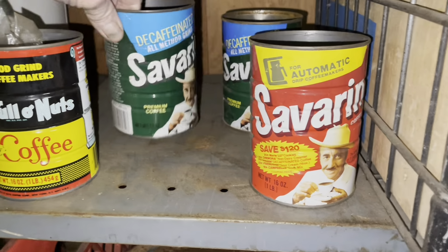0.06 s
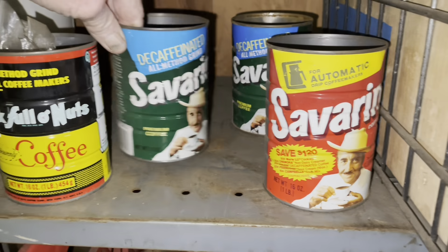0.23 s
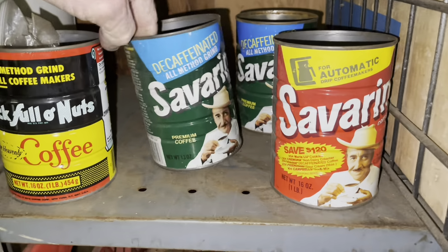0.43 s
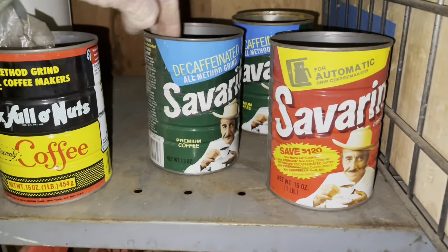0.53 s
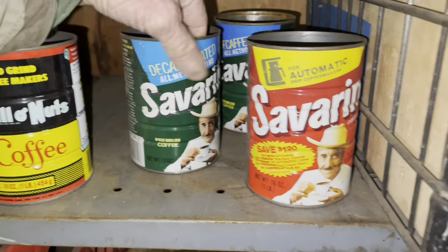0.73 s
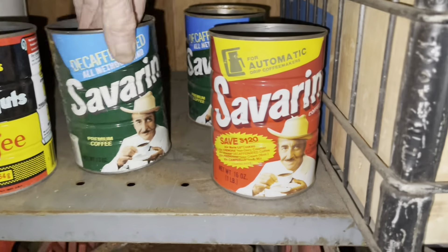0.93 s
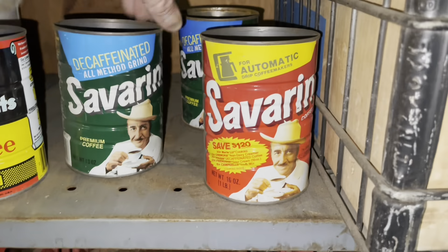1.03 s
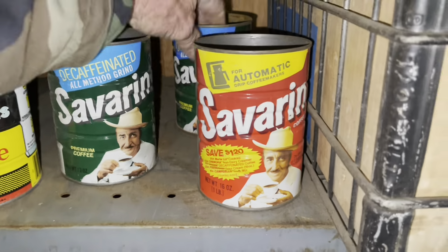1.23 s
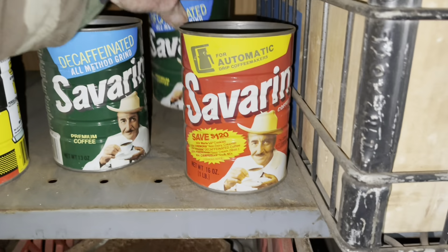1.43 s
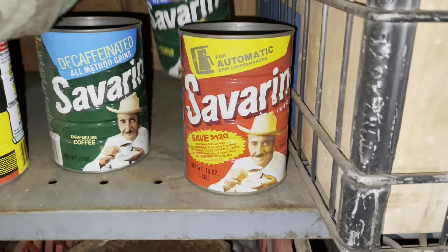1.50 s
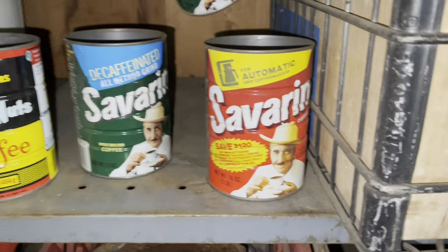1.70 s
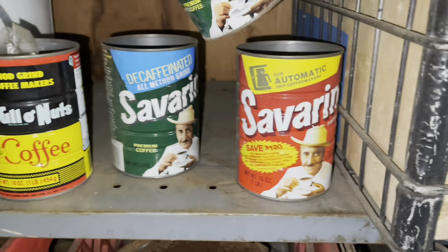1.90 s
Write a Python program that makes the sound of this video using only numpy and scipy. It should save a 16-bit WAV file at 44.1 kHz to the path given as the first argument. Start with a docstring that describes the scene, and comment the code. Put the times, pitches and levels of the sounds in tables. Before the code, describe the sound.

Hollow tin cans clunk and scrape as they are shifted around a metal shelf.

```python
"""Coffee tins on a steel shelf

Empty tins are shifted by hand on a sheet-steel shelf in a garage. One is set down, rocks, scrapes
along and clinks against its neighbour; a last one is knocked. Impacts and stick-slip friction excite
the normal modes of three resonators: the hollow tin, the booming shelf and the thin, bright tin wall."""
import sys
import numpy as np
from scipy import signal
from scipy.fft import rfft, irfft, next_fast_len
from scipy.io import wavfile
from scipy.ndimage import uniform_filter1d

SR = 44100
rng = np.random.default_rng(int(sys.argv[2]) if len(sys.argv) > 2 else 0)


def inscribe(sig):
    """Save sig as 16-bit PCM at rate SR to the path in sys.argv[1].

    A 1-D sig is mono; a 2-D sig holds one channel per row.
    Samples are clipped to [-1, 1] before scaling.
    """
    pcm = np.round(np.clip(np.atleast_2d(sig).T, -1, 1) * 32767)
    wavfile.write(sys.argv[1], SR, pcm.astype(np.int16))


N = 85995
T = np.arange(SR) / SR  # time axis of one free decay [s]

# Modes of the tin's hollow and of the shelf (frequency [Hz], level [dB], T60 [s])
HOLLOW_MODES = [(462, -3, 0.13), (544.6, -10.5, 0.067), (615.4, -11.5, 0.1)]
SHELF_MODES = [(62.2, -15, 0.77), (112.4, -16.5, 0.62), (151.5, -16, 0.35), (190.4, -8.5, 0.39),
               (242.1, -3, 0.27), (271.5, -4.5, 0.15), (444.6, 3, 0.14), (489.5, 3.5, 0.097),
               (537, -3.5, 0.33), (582.2, -2, 0.14)]
# Spectra of the dense modes: shelf clang, tin-wall clash (frequency [Hz], level [dB])
CLANG_SPECTRUM = [(40, -26.5), (110, 4), (420, 1), (600, 5.5), (720, -2.5), (1000, 0), (2100, -7),
                  (2800, -20.5), (14000, -75)]
CLASH_SPECTRUM = [(300, -11), (2100, -3.5), (2700, -1.5), (4000, 5.5), (5400, 1), (7500, 1), (8900, 1.5),
                  (10100, -10.5), (11500, 2), (13500, -34)]
# Their decay times (frequency [Hz], T60 [s])
CLANG_DECAY = [(100, 0.81), (1500, 0.25), (5000, 0.52)]
CLASH_DECAY = [(1000, 0.29), (10000, 0.15)]
# Tin on shelf (time [s], hollow pitch [Hz], hollow [dB], boom [dB], clang [dB], clash [dB]);
# each level column is relative to its own resonator
IMPACTS = [(0.17, 468.3, -13.5, -34.5, -42, -30.5), (0.368, 455.2, -5.5, -24, -31.5, -38),
           (0.378, 465, -8.5, -47, -28.5, -31.5), (0.519, 494, -15, -25, -34.5, -38.5),
           (0.758, 460, -32, -30, -40.5, -33), (0.927, 450.4, -9, -27.5, -29.5, -29),
           (1.037, 477, -18.5, -28, -27.5, -26), (1.131, 469, -16, -28.5, -38, -34),
           (1.14, 473, -37, -25.5, -31, -30), (1.356, 469, -13, -26.5, -24.5, -31),
           (1.37, 445, -16.5, -23, -33.5, -33.5)]
CONTACT_S, SWELL_S, CRACK_S, CRACK_DB = .001, .003, .006, 4
OVERTONE_BAND_HZ, OVERTONE_T60_S, OVERTONE_DB = (680, 2100), 0.47, -13  # inharmonic shelf partials
def knocks():
    """Impact excitation: hollow, shelf and wall decay freely; the hollow's pitch shifts with the grip."""
    out = np.zeros((2, N))
    rise, swell = 1 - np.exp(-T / CONTACT_S), 1 - np.exp(-T / SWELL_S)
    crack = rise * (1 + amp(CRACK_DB) * np.exp(-T / CRACK_S))
    overtone_hz = np.exp(rng.uniform(*np.log(OVERTONE_BAND_HZ), size=24))
    poles = 2j * np.pi * overtone_hz - np.log(1000) / OVERTONE_T60_S
    overtones = np.exp(np.outer(poles, T)) * (OVERTONE_BAND_HZ[0] / overtone_hz)[:, None]
    for s, pitch_hz, hollow_db, boom_db, clang_db, clash_db in IMPACTS:
        hollow = ring([(hz * pitch_hz / HOLLOW_MODES[0][0], db, t60) for hz, db, t60 in HOLLOW_MODES])
        phases = np.exp(2j * np.pi * rng.random((2, len(overtone_hz))))
        boom = ring(SHELF_MODES, spread_db=2.0)
        add(out, s, swell * (amp(hollow_db) * hollow + amp(boom_db) * boom))
        add(out, s, amp(clang_db + OVERTONE_DB) * rise * (phases @ overtones).real)
        add(out, s, amp(clang_db) * colour(crack * dense_modes(CLANG_DECAY), CLANG_SPECTRUM))
        add(out, s, amp(clash_db) * colour(crack * dense_modes(CLASH_DECAY), CLASH_SPECTRUM) / 2)
    return out


# Modes of the thin tin wall (frequency [Hz], level [dB], T60 [s])
WALL_MODES = [(3169, 3, 0.062), (3880, 7, 0.028), (4584, 0.5, 0.052), (8680, 3.5, 0.066), (9280, 3, 0.074)]
# Friction forces on the sliding tin (time [s], drag level [dB], grit level [dB])
FRICTION = [(0, -52, -57), (.31, -53, -61.5), (.5, -39, -51), (.55, -23.5, -56), (0.587, -25, -43),
            (0.638, -39.5, -68), (0.749, -43, -47), (0.76, -22, -42.5), (.855, -25.5, -35),
            (.895, -23, -40.5), (.94, -24.5, -41.5), (1.001, -24.5, -46), (1.11, -35.5, -56),
            (1.15, -25.5, -45), (1.274, -29, -47.5), (1.34, -42, -51.5), (1.399, -31.5, -62),
            (1.458, -57.5, -75.5), (1.95, -60.5, -66)]
HAND_DAMPING_S = 0.052  # time constant with which the hand stills the wall's clash
def scrape():
    """Stick-slip friction: drag drives the hollow and the shelf; grit under the rim drives the wall."""
    s, drag_db, grit_db = np.transpose(FRICTION)
    t, force = np.arange(N) / SR, slips()
    drag = force * amp(np.interp(t, s, drag_db))
    grit = force * amp(np.interp(t, s, grit_db))
    hollow = amp(-6.5) * excite(drag, ring(HOLLOW_MODES))
    boom = amp(-4) * excite(drag, ring(SHELF_MODES))
    clang = amp(-11) * excite(drag, colour(dense_modes(CLANG_DECAY), CLANG_SPECTRUM))
    clash = excite(grit, colour(dense_modes(CLASH_DECAY) * np.exp(-T / HAND_DAMPING_S), CLASH_SPECTRUM))
    wall = amp(-4) * excite(grit, ring(WALL_MODES))
    return hollow + boom + clang + clash + wall


def slips(per_second=1000, spread_db=4.2, judder_s=.014, judder_db=3):
    """Friction as a Poisson process: uneven force pulses that swell and fade as the tin judders."""
    sizes = amp(spread_db * np.minimum(rng.exponential(1, N), 4)) * rng.choice([-1, 1], N)
    judder = unit_rms(uniform_filter1d(rng.standard_normal(N), round(judder_s * SR)))
    return unit_rms(sizes * amp(judder_db * judder) * (rng.random(N) < per_second / SR))


# Modes of the rim and of a tin damped by the hand (frequency [Hz], level [dB], T60 [s])
RIM_MODES = [(3015, -14, .45), (3752, -3, 0.3), (4030, -7, .25), (4560, -4, 0.44), (5206, -7, 0.22),
             (5561, -12, .35), (6132, 1, 0.25), (6315, -10, 0.22), (7074, -4, 0.15), (7607, -1, 0.16),
             (8285, -9, 0.15), (8737, -2, 0.19), (9130, -3, 0.13)]
HELD_MODES = [(529, 7.5, 0.035), (601, 9, 0.019), (852, -1.5, 0.018), (1070, -1.5, 0.0045)]
# The tin rocks on its base; the held tin bumps (time [s], level [dB])
ROCKINGS = [(0.227, -31.5), (0.813, -17.5), (0.951, -11.5), (0.996, -19.5), (1.076, -27.5), (1.235, -18.5),
            (1.246, -20), (1.277, -25.5), (1.412, -15)]
HELD_BUMPS = [(0.37, -23), (0.524, -21), (0.993, -21), (1.356, -15.5), (1.517, -27.5)]
def light_contacts(clink_s=1.038, clink_db=-33.5):
    """Selective excitation: clinking rims ring high modes, rocking the hollow, bumps a few damped modes."""
    out = np.zeros((2, N))
    add(out, clink_s, amp(clink_db) * (ring(RIM_MODES) + ring(WALL_MODES)))
    for s, db in ROCKINGS:
        add(out, s, amp(db) * (1 - np.exp(-T / SWELL_S)) * ring(HOLLOW_MODES))
    for s, db in HELD_BUMPS:
        add(out, s, amp(db) * ring(HELD_MODES))
    return out


# Modes of the snagging rim (frequency [Hz], level [dB], T60 [s])
SQUEAK_MODES = [(3850, -8.5, .06), (4280, 0.5, 0.0092), (4460, 1.5, 0.019)]
def snag(start_s=.8545, fade_s=0.014, level_db=-35):
    """Transient stick-slip: the rim catches, then lets go in a fading burst heard as a squeak."""
    out = np.zeros((2, N))
    burst = slips()[:SR] * np.exp(-T / fade_s)
    add(out, start_s, amp(level_db) * excite(burst, ring(SQUEAK_MODES)))
    return out


# Modes of the carried tin (frequency [Hz], level [dB])
RUBBED_MODES = [(457.6, -55), (1303, -63), (3165, -66), (3801, -67), (4590, -70), (6885, -73)]
def finger_rub(bandwidth_hz=9.3, end_s=0.37):
    """Random forcing: rubbing fingers sustain narrow resonances that fade as the tin is set down."""
    t, shape = np.arange(N) / SR, (len(RUBBED_MODES), N)
    pole = np.exp(-np.pi * bandwidth_hz / SR)
    force = rng.standard_normal(shape) + 1j * rng.standard_normal(shape)
    wavers = signal.lfilter([1 - pole], [1, -pole], force)
    tones = sum(amp(db) * unit_rms((waver * np.exp(2j * np.pi * hz * t)).real)
                for (hz, db), waver in zip(RUBBED_MODES, wavers))
    return tones * np.sqrt(np.clip(1 - t / end_s, 0, 1))


# Reverberation time (frequency [Hz], T60 [s])
GARAGE_DECAY = [(220, 0.82), (450, 0.11)]
def garage_reverb(sound, level_db=-11):
    """Reverberation: the garage's dense modes prolong the sound, the bass longest."""
    return amp(level_db) * excite(sound, dense_modes(GARAGE_DECAY))


# Background spectrum (frequency [Hz], level [dB])
ROOM_SPECTRUM = [(20, -29), (62, 5.5), (250, -2), (350, -17.5), (450, -13.5), (720, -24.5), (9000, -34.5),
                 (14000, -67)]
def room_tone(level_db=-50.5):
    """Stationary noise: a faint, low rumble fills the garage."""
    return amp(level_db) * unit_rms(colour(noise_pair(N), ROOM_SPECTRUM))


# Likeness of left and right (frequency [Hz], coherence [0-1])
COHERENCE = [(500, 0.97), (1000, 0.62), (2000, 0.16)]
def noise_pair(count):
    """Spatial coherence: white noise at two nearby points is most alike at long wavelengths."""
    shared, separate = rfft(rng.standard_normal((2, count)))
    same = np.clip(read(COHERENCE, np.fft.rfftfreq(count, 1 / SR)), -1, 1)
    return irfft(np.array([shared, same * shared + np.sqrt(1 - same ** 2) * separate]), count)


def dense_modes(t60s, size=256):
    """Modal overlap: countless modes merge into noise, each band decaying at its own rate."""
    hz, t, bands = signal.stft(noise_pair(SR), SR, nperseg=size)
    decay = np.exp(-np.log(1000) * t / read(t60s, hz)[:, None])
    return signal.istft(bands * decay, SR, nperseg=size)[1][:, :SR]


def ring(modes, spread_db=0):
    """Modal superposition: damped sines of alternating sign; the strike point varies their levels."""
    offsets_db = spread_db * rng.standard_normal(len(modes))
    return sum((-1) ** k * amp(db + offsets_db[k]) * np.exp(-np.log(1000) * T / t60)
               * np.sin(2 * np.pi * hz * T) for k, (hz, db, t60) in enumerate(modes))


def excite(force, body):
    """Linear response: a force convolved with a body's impulse response, scaled to unit energy."""
    body = np.atleast_2d(body)
    return signal.fftconvolve(np.atleast_2d(force), body / np.linalg.norm(body[0]), axes=1)[:, :N]


def colour(x, spectrum, size=4096):
    """Minimum-phase filtering: a causal, unit-energy response imposes the spectrum."""
    log_gain = np.log(amp(read(spectrum, abs(np.fft.fftfreq(size, 1 / SR)))))
    taps = np.fft.ifft(np.exp(np.conj(signal.hilbert(log_gain)))).real[:size // 2]
    return signal.oaconvolve(x, taps[None] / np.linalg.norm(taps), axes=1)[:, :x.shape[1]]


def amp(db):
    """Decibels to amplitude ratio."""
    return 10 ** (np.asarray(db) / 20)


def unit_rms(x):
    """Normalisation to unit mean power."""
    return x / np.sqrt(np.mean(x ** 2) + 1e-20)


def read(points, hz):
    """Interpolation on a log-frequency axis."""
    f, value = np.transpose(points)
    return np.interp(np.log(hz + 1), np.log(f + 1), value)


def add(mix, s, sound):
    """Superposition of a sound starting at time s."""
    part = mix[:, max(round(s * SR), 0):][:, :sound.shape[-1]]
    part += sound[..., :part.shape[1]]


def scene():
    """Superposition of direct sound, reverberation and background."""
    tins = finger_rub() + knocks() + light_contacts() + scrape() + snag()
    return tins + garage_reverb(tins) + room_tone()


# Left microphone port relative to right (frequency [Hz], phase lead [rad])
PORT_PHASE = [(150, .05), (500, .35), (1100, .9), (2000, -.4), (4000, .4), (9000, -.8)]
# Left port relative to right (frequency [Hz], level [dB])
PORT_LEVEL = [(500, -1), (1500, 0.84)]
CUTOFF_HZ = 15900
def record(dry):
    """Interchannel differences: two close ports differ in phase and level; a low-pass limits the band."""
    size = next_fast_len(N + SR)
    hz = np.fft.rfftfreq(size, 1 / SR)
    port = amp(read(PORT_LEVEL, hz) / 2) * np.exp(.5j * read(PORT_PHASE, hz))
    pair = irfft(rfft(dry, size) * np.array([port, 1 / port]), size)[:, :N]
    lowpass = signal.firwin(511, CUTOFF_HZ, window=("kaiser", 9), fs=SR)
    return signal.oaconvolve(pair, lowpass[None], "same")


dry = scene()
out = record(dry)
inscribe(out)
```